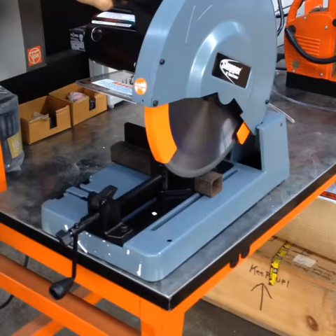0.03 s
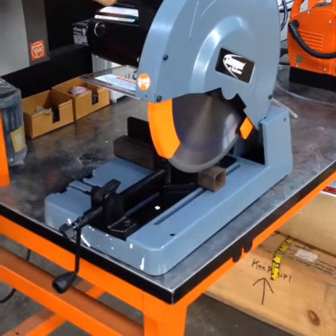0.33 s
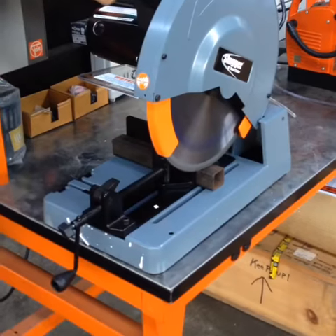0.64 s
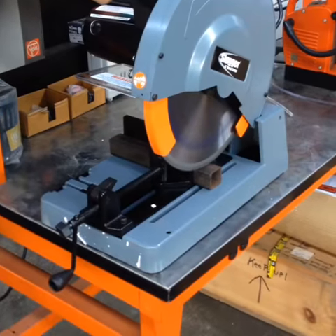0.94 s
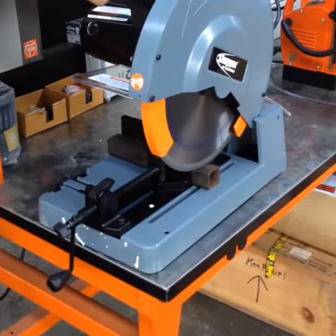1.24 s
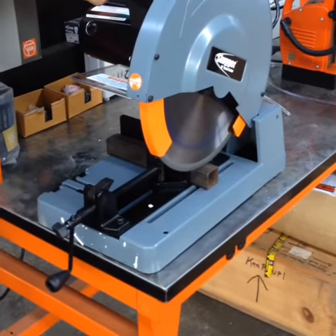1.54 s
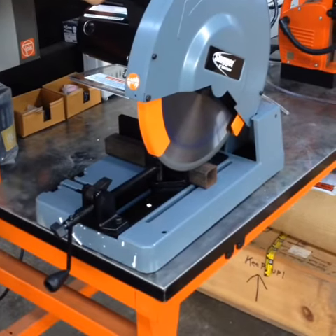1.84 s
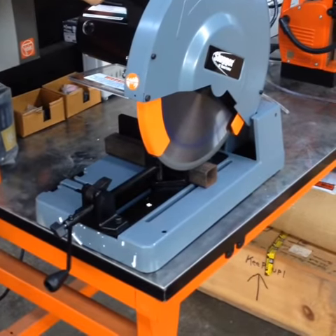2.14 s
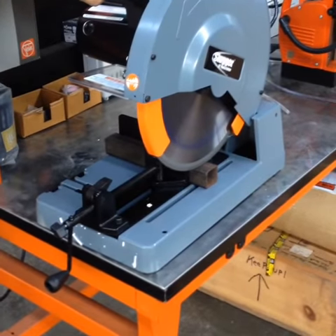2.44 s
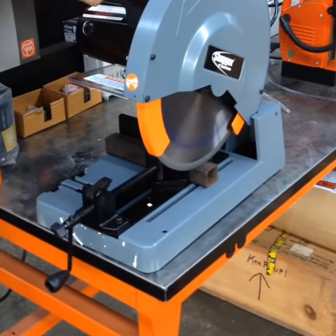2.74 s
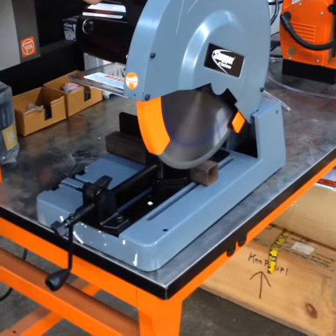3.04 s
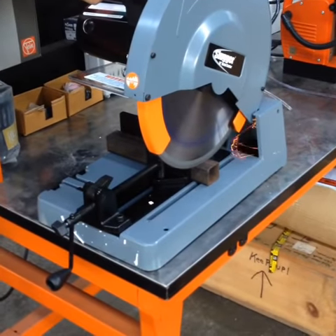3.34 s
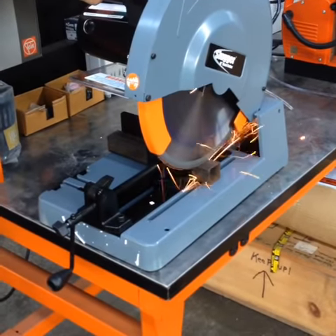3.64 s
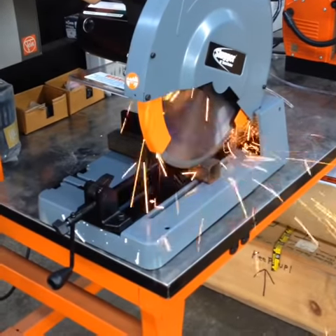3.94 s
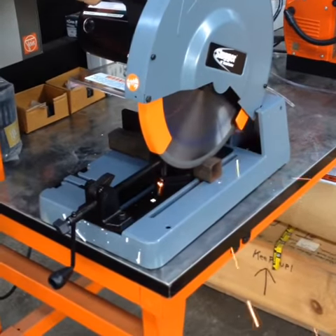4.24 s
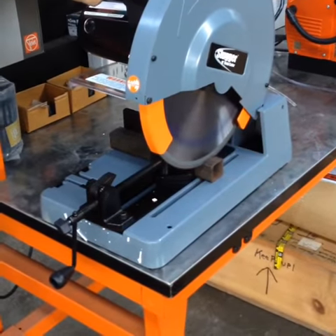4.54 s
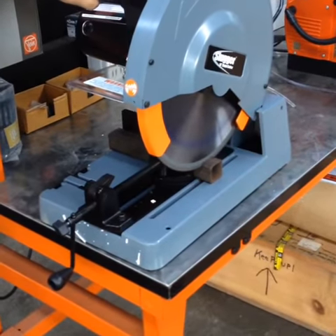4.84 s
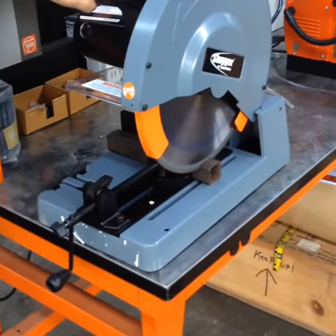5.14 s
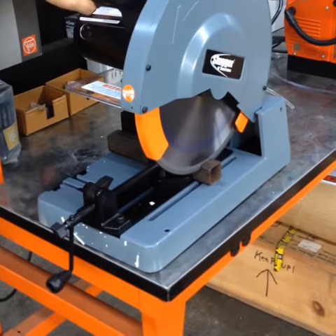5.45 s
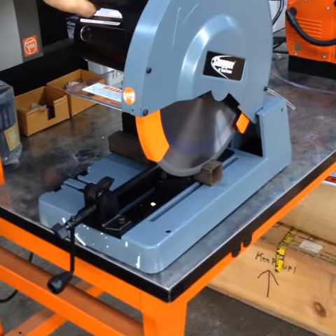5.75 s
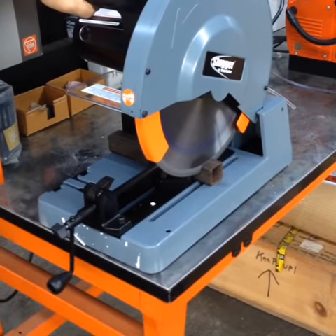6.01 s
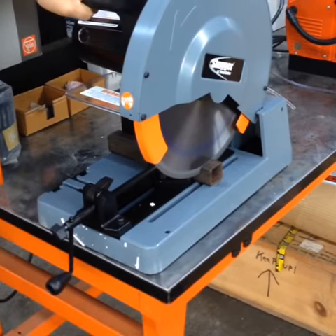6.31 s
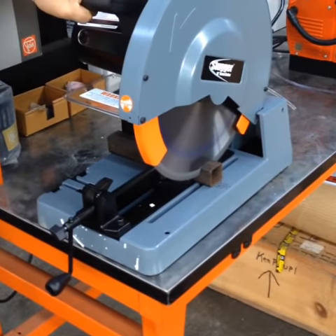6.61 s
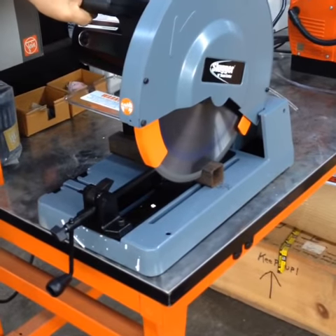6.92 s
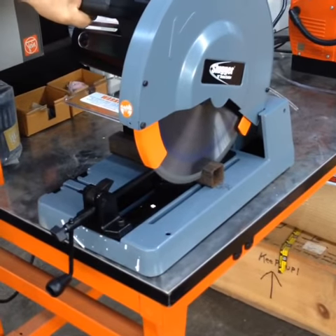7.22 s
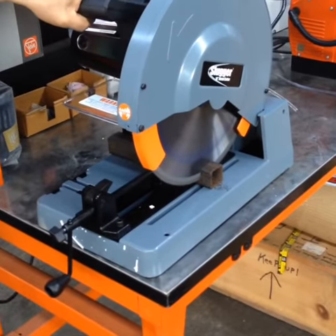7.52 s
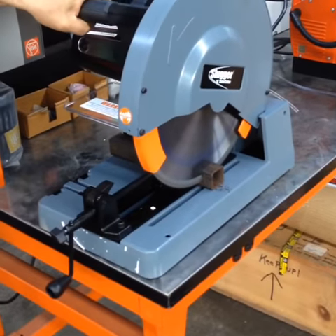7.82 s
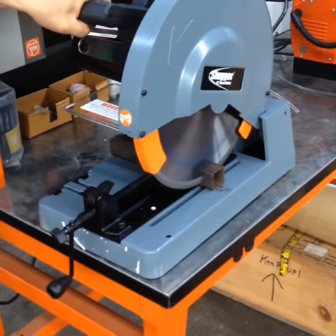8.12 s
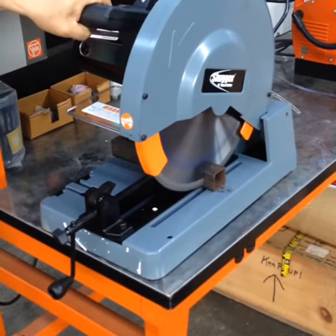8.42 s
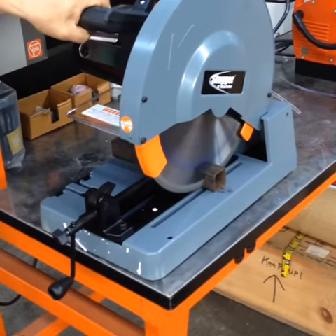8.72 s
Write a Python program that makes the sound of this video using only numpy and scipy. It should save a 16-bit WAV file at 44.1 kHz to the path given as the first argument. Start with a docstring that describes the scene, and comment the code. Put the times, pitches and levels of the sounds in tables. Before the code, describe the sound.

A chop saw cuts steel tube on a workshop bench, heard close up. The teeth roar and whistle as chips hiss, and the motor sags under the load while a few dull knocks shake the bench. About halfway through, the cut lightens and the blade speeds up, squealing and singing with a throbbing metallic whine. Fitful sprays of chips and small ticks continue over the ringing disc and a faint motor.

```python
"""A toothed chop saw cuts steel tube on a workshop bench, heard from close by.
First the teeth roar and whistle in the cut, chips hiss and the steel disc rings and squeals.
From 1.3 s the load drags the motor down; chips tick on the guard and snatching teeth knock the bench.
The feed eases after 3.2 s. From 4 s the loosened blade speeds up and sings, throbbing once a turn,
while the disc rings more freely and the motor and its fan come through."""
import sys
import numpy as np
from scipy import signal
from scipy.fft import rfft, irfft
from scipy.io import wavfile

SR = 44100
rng = np.random.default_rng(int(sys.argv[2]) if len(sys.argv) > 2 else 0)


def wav_record(signal):
    """Record a signal, one row per channel, as 16-bit PCM in the file named by sys.argv[1]."""
    frames = np.transpose(np.atleast_2d(signal))
    bounded = np.clip(frames, -1, 1)
    # unit amplitude maps onto the largest positive 16-bit level
    quanta = np.round(bounded * 32767).astype(np.int16)
    wavfile.write(sys.argv[1], SR, quanta)


N = 386757
T = np.arange(N) / SR
HZ = np.fft.rfftfreq(N, 1 / SR)
TEETH = 66

# spectrum of flying chips: (frequency [Hz], relative density [dB])
CHIP_SPECTRUM = [(1500, -36), (4000, -6), (6200, -3), (7000, 0), (8500, 1.5), (10800, 0), (12200, -1.5),
                 (12700, -5.5), (15000, -10.5)]


def amp(db):
    return 10 ** (np.asarray(db) / 20)


def unit(x):
    """Scales to rms 1."""
    return x / np.sqrt(np.mean(x ** 2) + 1e-20)


def ramp(start_s, takes_s):
    """Linear rise from 0 to 1."""
    return np.clip((T - start_s) / takes_s, 0, 1)


def bell(peak_s, sigma_s):
    """Gaussian swell, peak 1."""
    return np.exp(-np.minimum(((T - peak_s) / sigma_s) ** 2, 100) / 2)


def curves(rows):
    """Interpolates each value column over time."""
    times_s, *columns = np.transpose(rows)
    return [np.interp(T, times_s, column) for column in columns]


def colour(x, spectrum):
    """Filters by a spectrum, cutting below its first point; rms 1."""
    hz, db = np.transpose(spectrum)
    low_cut = 1 / np.sqrt(1 + (hz[0] / (HZ + 1)) ** 6)
    gain = amp(np.interp(np.log(HZ + 1), np.log(hz), db))
    return unit(irfft(rfft(x) * low_cut * gain, N))


def wander(hz):
    """Random drift up to about hz; rms 1."""
    grid_s = np.arange(0, N, 32) / SR
    grid_hz = np.fft.rfftfreq(len(grid_s), grid_s[1])
    spectrum = rfft(rng.standard_normal(len(grid_s))) / (1 + (grid_hz / hz) ** 2)
    return np.interp(T, grid_s, unit(irfft(spectrum, len(grid_s))))


def resonance(hz, centre_hz, width_hz):
    """Power response, peak 1."""
    return 1 / (1 + ((hz - centre_hz) / width_hz) ** 2) ** 2


def ringing(modes, drive):
    """Modes (frequency [Hz], level [dB], width [Hz]) under a broadband drive of rms 1."""
    power = np.zeros(len(HZ))
    for hz, db, width_hz in modes:
        peak = resonance(HZ, hz, width_hz)
        power += amp(db) ** 2 * peak / peak.mean()
    return irfft(rfft(drive) * np.sqrt(power), N)


def grains(per_s, spread_db):
    """Random clicks of uneven size; rms 1."""
    size = amp(spread_db * np.minimum(rng.exponential(1, N), 3))
    return unit(size * rng.choice([-1., 1.], N) * (rng.random(N) < per_s / SR))


def bursts(blows, decay_s):
    """Noise that jumps at each blow and decays."""
    envelope = sum(amp(db) * (T > s) * np.exp(-np.maximum(T - s, 0) / decay_s) for s, db in blows)
    return envelope * rng.standard_normal(N)


def bite_surge_db():
    """Deeper bites throw sprays of chips; other layers take a share of the rise."""
    # deep bites: (peak time [s], hiss rise [dB], sigma [s])
    bites = [(1.49, 2, .06), (3.026, 1.5, 0.013), (3.57, 3.5, 0.043), (3.997, 3, 0.13), (4.47, 2.5, 0.078),
             (4.94, 4, 0.03), (5.286, 4, .03), (6.17, 2, 0.036), (6.617, 4, .05), (6.902, 5, 0.073),
             (7.17, 5, 0.028), (7.29, 6.5, 0.043), (7.734, 5, 0.076), (8.446, 6, 0.019)]
    return sum(db * bell(s, sigma_s) for s, db, sigma_s in bites)


def cutting(tooth_cycles):
    """Each tooth tears noise from the tube; the bite deepens once a turn and chatters."""
    # cut, heavy then light: (time [s], relative shudder level [dB], relative roar level [dB])
    cut_levels = [(0.12, -42, -17), (1.17, -41.5, -17), (1.55, -38.5, -17.5), (3.04, -36, -17.5),
                  (3.1, -39, -19.5), (3.65, -34, -22.5), (4, -37, -20.5), (4.6, -46.5, -22),
                  (5.6, -41, -16.5), (5.95, -44.5, -20.5), (8.77, -43.5, -19.5)]
    # shudder of stock and bench: (frequency [Hz], relative density [dB])
    shudder_spectrum = [(32, -18), (60, -2.5), (100, -6), (140, 1), (200, 0), (250, 2), (355, -5.5),
                        (420, 4), (490, 3), (560, -9), (700, 0), (1200, -19), (3000, -40)]
    # roar under heavy and light feed: (frequency [Hz], relative density [dB])
    heavy_spectrum = [(370, -9), (430, -6.5), (600, -7), (1050, -4.5), (1350, -6), (1600, -3), (2050, -6),
                      (2300, 0), (3300, 1), (4300, -0.5), (4600, -3), (5400, -6), (5900, -12),
                      (15000, -27.5)]
    light_spectrum = [(350, -38), (600, -6.5), (1050, -5.5), (1500, -3.5), (2050, -4), (2300, 1), (3300, 0),
                      (4300, 2.5), (4600, -1), (5400, -2.5), (5900, -12), (9000, -32), (15000, -30)]
    shudder_db, roar_db = curves(cut_levels)
    surge_db = bite_surge_db()
    turn = np.cos(2 * np.pi * tooth_cycles / TEETH)
    tooth = np.cos(2 * np.pi * tooth_cycles)
    eased = ramp(start_s=3.23, takes_s=1.23)  # the feed lightens, the cut grows fitful
    chatter_db = wander(24) * (1.1 + .4 * eased)

    jolts = rng.standard_normal(N) + .52 * grains(per_s=30, spread_db=2.5)  # single teeth snag
    shudder = colour(jolts, shudder_spectrum)
    shudder *= amp(shudder_db + 3.5 + .45 * surge_db + .9 * turn + .67 * wander(18))

    grit = rng.standard_normal(N) + .36 * grains(per_s=900, spread_db=2.2)  # coarse pieces tear off
    tearing = grit * (1 + .3 * tooth)
    roar = np.sqrt(1 - eased) * colour(tearing, heavy_spectrum)
    roar += np.sqrt(eased) * colour(tearing, light_spectrum) * amp(-2.5)
    roar *= amp(roar_db - .23 + .2 * surge_db + .31 * turn + .83 * chatter_db)

    spray = unit(grains(per_s=7000, spread_db=1.1) + 1.3 * rng.standard_normal(N))
    hiss = colour(spray * (1 + .11 * tooth), CHIP_SPECTRUM)
    hiss *= amp(-22 + surge_db - 2 * eased + .36 * turn + .96 * chatter_db)
    return shudder + roar + hiss


def bench_echoes(x, share):
    """Guard, bench top and shelves reflect the sound within 3-33 ms."""
    delays = rng.integers(SR // 300, SR // 30, size=12)
    echoes = sum(rng.choice([-1, 1]) * np.roll(x, delay) for delay in delays)
    return (x + share * echoes) / np.sqrt(1 + len(delays) * share ** 2)


def housing():
    """Housing and bench resonate over a low hum, with a steady band near 815 Hz."""
    # resonances, and a band near 815 Hz: (frequency [Hz], level [dB], width [Hz])
    modes = [(64, -52, 6.2), (90, -57.5, 20), (312.5, -53.5, 11), (435, -53, 29), (495, -46, 13),
             (815, -48, 20)]
    hum_hz, hum_db = 63.6, -54
    hum = amp(hum_db) * unit(np.sin(2 * np.pi * hum_hz * T))
    return ringing(modes, rng.standard_normal(N)) + hum


def tooth_tone(tooth_cycles, order, throb, rough, rasp_rad=0):
    """Tone at order x tooth rate; disc wobble swells it once a turn, uneven teeth roughen it."""
    high_spot_turns = np.interp(T, [4.7, 5.4], [.38, .88])  # creeps round as speed returns
    swell = 1 + throb * np.cos(2 * np.pi * (tooth_cycles / TEETH - high_spot_turns))
    phase = 2 * np.pi * (order * tooth_cycles + rng.random()) + rasp_rad
    return unit((swell + rough * wander(24)) * np.cos(phase) + rough * wander(28) * np.sin(phase))


def whistle(tooth_cycles):
    """Teeth entering the cut whistle thinly, fade, then are smothered as they bite deeper."""
    # overtones: (multiple of tooth rate, relative level [dB])
    overtones = [(3, 0), (4, -9), (6, -17), (8, -7)]
    fade_db_per_s, smother_s, smother_db_per_s = 2.2, 3.05, 36
    level_db = -23.5 - fade_db_per_s * T - smother_db_per_s * np.maximum(T - smother_s, 0)
    tilt_db = -2.5 * ramp(1.25, .55)  # rising load damps the higher overtones
    tones = sum(amp(db + tilt_db * (k - 1.5)) * tooth_tone(tooth_cycles, round(k), throb=.1, rough=.17)
                for k, db in overtones)
    return amp(level_db) * tones


def disc(tooth_cycles):
    """Uneven teeth repeat every turn; the disc's modes flare as the speed sweeps past them."""
    # free modes of the steel disc: (frequency [Hz], relative level [dB])
    free_modes = [(4258, -38), (4317, -34), (4743, -39), (5749, -39), (6508, -38.5), (7014, -44),
                  (7517, -47), (8016, -40), (8505, -42.5), (8974, -39), (9428, -38), (10198, -39),
                  (10490, -35), (10734, -41), (10971, -36), (11712, -43), (11978, -36), (12166, -41)]
    # how freely it rings: (time [s], gain [dB])
    freedom = [(0, -25), (2.3, -13), (3.8, -13), (4.4, -3), (5.8, -2.5), (6.7, -1), (8.77, 4)]
    ring_db, = curves(freedom)
    pattern = irfft(np.exp(2j * np.pi * rng.random(800)), 16384)
    teeth = np.interp(tooth_cycles / TEETH % 1, np.linspace(0, 1, len(pattern)), pattern)
    drive = unit(.5 * unit(teeth) + rng.standard_normal(N))
    modes = [(hz, db, 4 + hz * .0016) for hz, db in free_modes]
    return ringing(modes, drive) * amp(ring_db + .45 * bite_surge_db())


def squeals():
    """Rubbing in the slot briefly excites disc modes, sometimes several at once; the last row is the tube
    itself ringing roughly."""
    # rubs, the last one the tube ringing: (peak time [s], frequency [Hz], level [dB], sigma [s], width [Hz])
    rubs = [(0.64, 4330, -28, 0.95, 97), (2.1, 10490, -32, 0.13, 30), (2.301, 2290, -30.5, 0.47, 40),
            (2.302, 4160, -21, 0.086, 46), (2.36, 8970, -29, .1, 16), (2.83, 4025, -24, 0.1, 49),
            (2.841, 8500, -32, 0.14, 15), (3.98, 12070, -24, .04, 130), (4.068, 9100, -23.5, 0.12, 25),
            (4.1, 8300, -25, 0.11, 25), (4.33, 10940, -27, 0.13, 40), (4.4, 9900, -23.5, 0.14, 25),
            (4.45, 8527, -27, .2, 22), (4.45, 12200, -29, .14, 180), (4.478, 10500, -29, 0.13, 97),
            (4.56, 9981, -25, .08, 18), (4.6, 11348, -32, .2, 35), (4.7, 9006, -30, 0.31, 20),
            (4.95, 8030, -45, 0.28, 18), (5.36, 3240, -28, 0.55, 80)]
    out = np.zeros(N)
    for s, hz, db, sigma_s, width_hz in rubs:
        phase = 2 * np.pi * hz * T
        narrow_noise = wander(width_hz) * np.cos(phase) + wander(width_hz) * np.sin(phase)
        out += amp(db) * bell(s, sigma_s) * narrow_noise
    return out


def chips():
    """Larger chips tick off the guard."""
    # chip strikes: (time [s], relative level [dB])
    strikes = [(1.4794, -18), (2.3194, -8), (2.7506, -9), (3.0394, -3), (4.9194, -20), (6.6109, -7),
               (6.9094, -1), (7.7794, -2), (8.2746, -1), (8.4394, -11), (8.6994, -10)]
    rattle = bursts(strikes, decay_s=.011)
    return amp(-13) * np.std(rattle) * colour(rattle, CHIP_SPECTRUM)


def knocks():
    """A snatching tooth thumps the bench."""
    # snatches: (time [s], level [dB])
    snatches = [(1.51, -23), (1.97, -23), (2.74, -20), (3.02, -25), (3.45, -20), (3.57, -26.5),
                (3.92, -23.5)]
    # bench response: (frequency [Hz], relative density [dB])
    bench_spectrum = [(150, -10.0), (240, 2.5), (330, -17), (420, 5), (700, -21.5)]
    thump = bursts(snatches, decay_s=.031)
    return np.std(thump) * colour(thump, bench_spectrum)


def whine(tooth_cycles, tooth_hz):
    """Freed by the slot, the blade sings on multiples of the tooth rate; higher ones are rougher."""
    # steady overtones: (multiple of tooth rate, level [dB])
    overtones = [(1, -36.5), (2, -31), (3, -33), (4, -36), (6, -46), (7, -44), (8, -34), (9, -31),
                 (10, -39), (11, -41)]
    # resonances that lift a passing overtone: (frequency [Hz], level [dB], width [Hz])
    modes = [(1212, -30.5, 9.8), (2444, -23, 20), (2504, -22.5, 16), (3655, -20, 41), (3778, -19.5, 22),
             (3855, -17.5, 12), (3929, -24.5, 9.4), (4900, -30, 56), (5100, -27, 45)]
    # blade locks on to one overtone: (peak time [s], multiple of tooth rate, level [dB], rise sigma [s])
    lock_ons = [(5.48, 2, -22, .08), (5.5, 7, -23.5, .11), (5.5, 10, -30, .2), (5.87, 9, -25, 0.2),
                (6.082, 2, -16, 0.42), (6.85, 9, -26, 0.71), (7, 6, -30, .55), (7.2, 11, -29.5, 0.35),
                (7.68, 2, -26, 0.045), (7.82, 4, -25, .19), (8.35, 2, -23, 0.057), (8.66, 8, -26, 0.14),
                (8.74, 4, -22, .24), (8.75, 3, -25.5, 0.35)]
    fall_to_rise = 1.42
    judder_rad = .28 * bell(4.54, .4) * wander(110)  # teeth break through the tube wall
    out = np.zeros(N)
    for k, steady_db in overtones:
        k = round(k)
        power = amp(steady_db) ** 2
        power += sum(amp(db) ** 2 * resonance(k * tooth_hz, hz, width_hz) for hz, db, width_hz in modes)
        power += sum((amp(db) * bell(s, rise_s * np.where(T > s, fall_to_rise, 1))) ** 2
                     for s, order, db, rise_s in lock_ons if round(order) == k)
        tone = tooth_tone(tooth_cycles, k, throb=.29, rough=.082 * k, rasp_rad=k * k / 10 * judder_rad)
        out += np.sqrt(power) * tone
    return out * ramp(start_s=3.97, takes_s=.1)


def motor_and_fan(tooth_cycles):
    """The geared motor's note and its fan emerge once the roar has eased; the fan later recedes."""
    # fan tones: (multiple of vane rate, relative level [dB])
    fan_tones = [(1, -43), (3, -35), (4, -41)]
    vanes_per_tooth, motor_per_tooth, motor_db = .947, .623, -45.5
    fan = sum(amp(db) * tooth_tone(tooth_cycles, k * vanes_per_tooth, throb=0, rough=.44)
              for k, db in fan_tones)
    fan *= amp(.5 - 9 * ramp(7.5, 1.55))
    motor = amp(motor_db) * tooth_tone(tooth_cycles, motor_per_tooth, throb=0, rough=.25)
    return ramp(start_s=4.8, takes_s=.63) * (motor + fan)


def scene():
    """One blade speed drives every tooth sound; two identical channels."""
    # blade speed, dragged down by the feed, then recovering: (time [s], tooth rate [Hz])
    speed = [(0, 1377.5), (1.33, 1377.5), (2, 1333), (3, 1248), (3.35, 1207), (4.03, 1200), (4.4, 1232),
             (4.78, 1282), (5, 1292), (5.42, 1320), (5.92, 1326.5), (6.3, 1316), (7, 1315.5),
             (7.65, 1320.5), (7.85, 1315), (8.3, 1320), (8.77, 1311)]
    tooth_hz, = curves(speed)
    tooth_cycles = np.cumsum(tooth_hz + .44 * wander(6.9)) / SR
    body = housing()
    tones = whistle(tooth_cycles) + whine(tooth_cycles, tooth_hz) + motor_and_fan(tooth_cycles)
    steel = disc(tooth_cycles) + squeals()
    cut = bench_echoes(cutting(tooth_cycles), share=.12)
    saw = body + tones + steel + cut + chips() + knocks()
    return np.array([saw, saw])


def record(dry):
    """Abrupt start in mid cut, soft limiting of the highest peaks, low-pass."""
    start_s, ceiling, cutoff_hz = .12, .75, 15260
    opened = dry * np.clip((T - start_s) * SR / 32, 0, 1)
    rounded = opened / (1 + (opened / ceiling) ** 8) ** (1 / 8)
    low_pass = signal.firwin(767, cutoff_hz, window=("kaiser", 9), fs=SR)
    return signal.oaconvolve(rounded, low_pass[None], "same")


dry = scene()
out = record(dry)
wav_record(out)
```